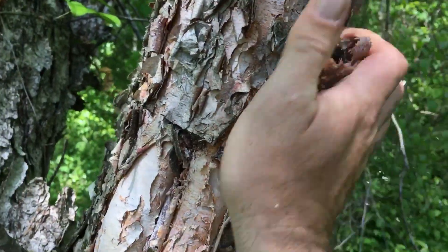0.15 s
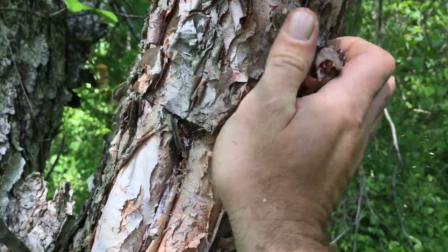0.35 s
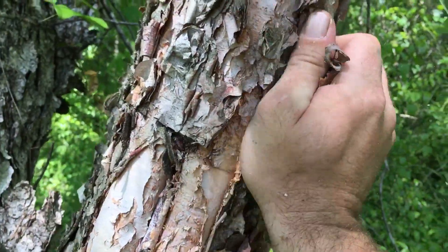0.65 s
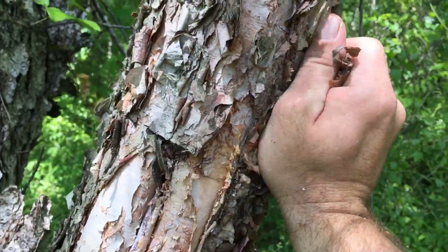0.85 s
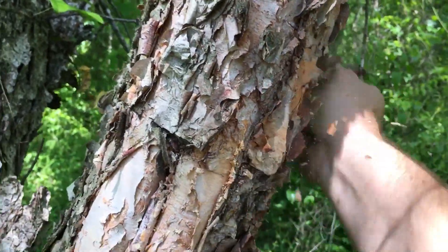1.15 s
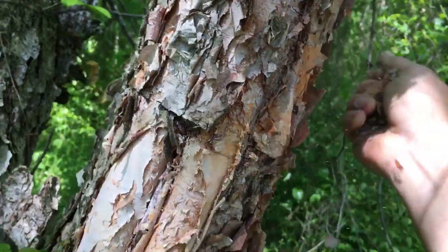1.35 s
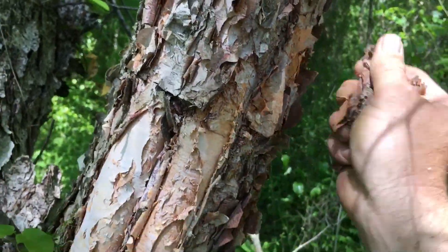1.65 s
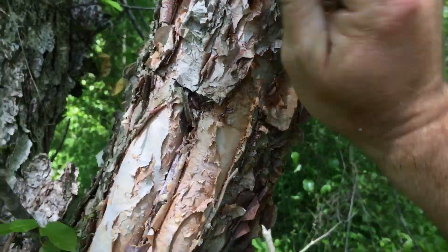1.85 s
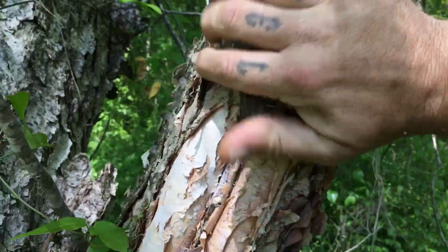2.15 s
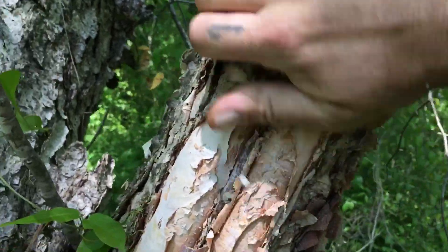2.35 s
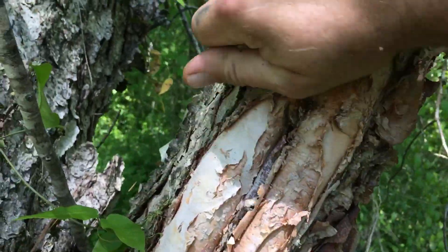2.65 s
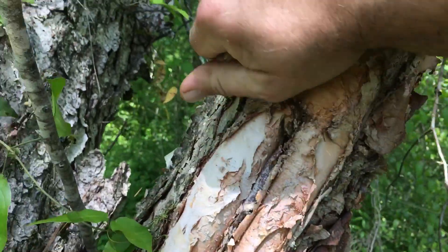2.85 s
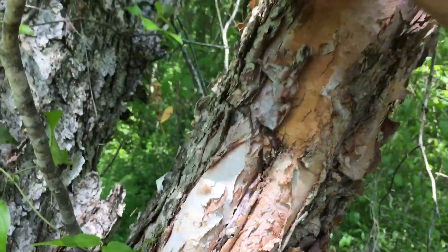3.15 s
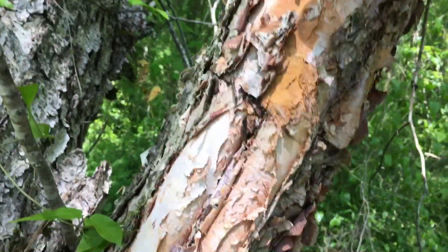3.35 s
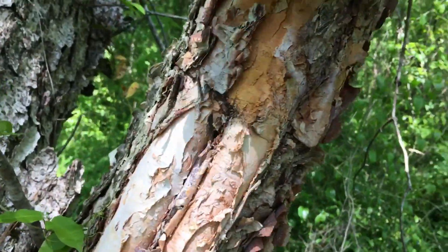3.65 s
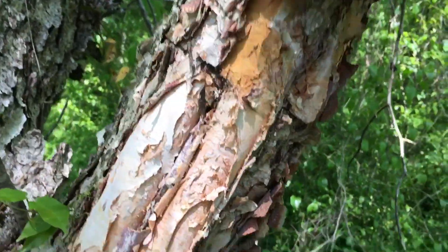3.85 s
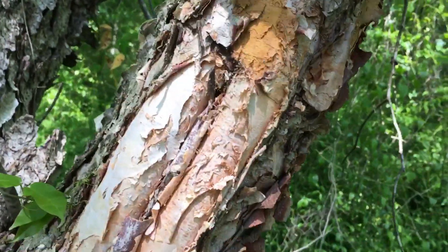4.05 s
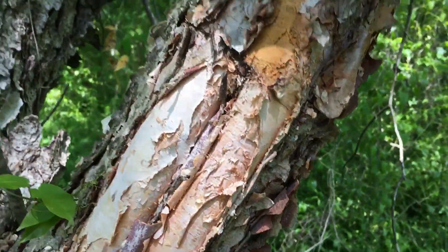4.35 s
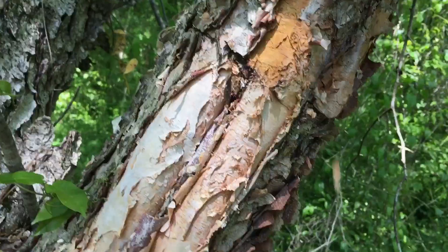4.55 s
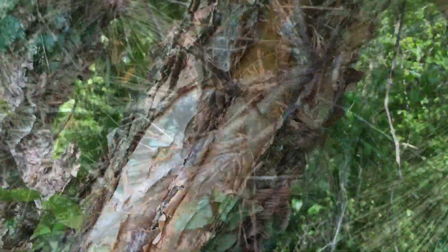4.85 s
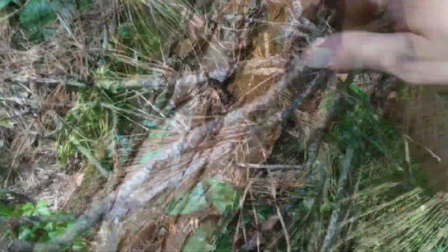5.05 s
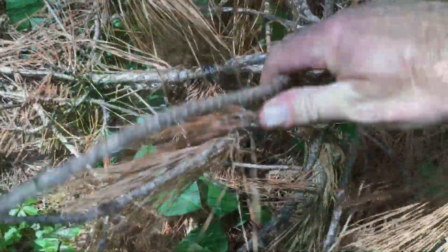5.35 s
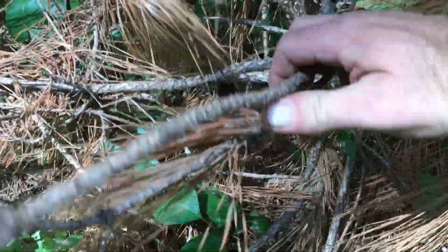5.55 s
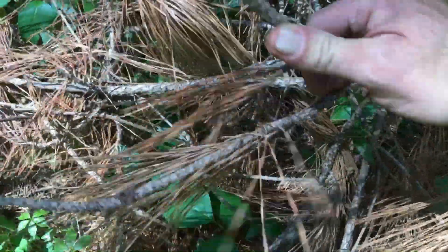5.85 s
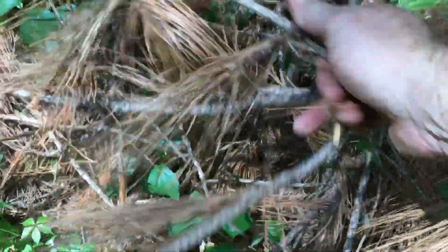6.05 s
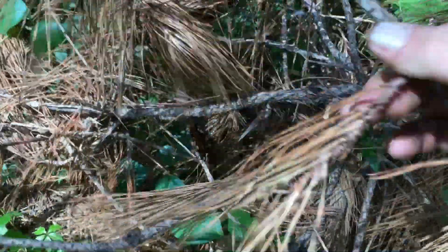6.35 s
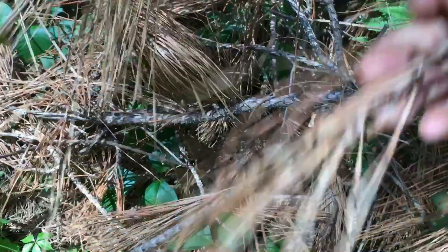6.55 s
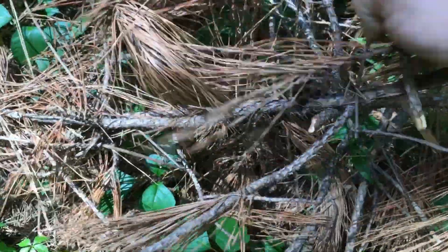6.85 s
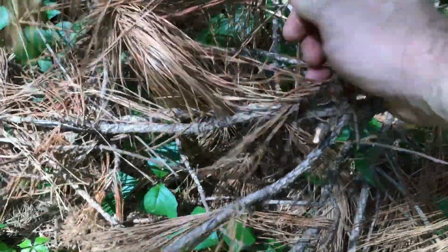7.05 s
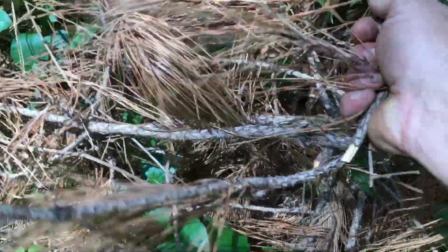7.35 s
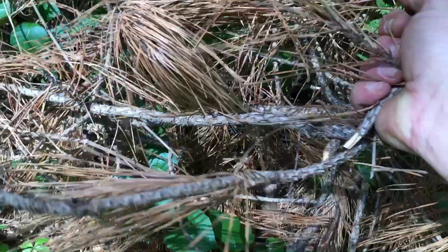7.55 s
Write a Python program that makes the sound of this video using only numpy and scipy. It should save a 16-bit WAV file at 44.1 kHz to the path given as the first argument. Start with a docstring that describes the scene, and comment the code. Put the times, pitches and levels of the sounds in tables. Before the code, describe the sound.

A steady, soft forest rush with low air buffeting lies under very close bark peeling, brittle and dry, with denser cracking midway and again just before the handling changes. Then sparse needle swishes and tiny twig ticks; the background suddenly becomes much quieter. One explosive snap overloads the microphone, echoes faintly among the trees, and delicate stirring follows.

```python
"""Close by in a murmuring wood, a hand peels and crushes dry bark: flakes crackle as clouds of tiny ringing
grains, and thicker plates crack off as sudden releases with splinters, heard through damped resonances.
From 5 s it stirs dead pine branches on the ground; the murmur drops away abruptly half a second later.
Just after 6 s a twig snaps as bursts of noise, loud enough to overload the microphone; low thuds follow it,
the wood answers with a faint, bright tail, and the stirring goes on lightly to the end."""
import sys
import numpy as np
from scipy import signal
from scipy.fft import rfft, irfft, next_fast_len
from scipy.io import wavfile
from scipy.ndimage import uniform_filter1d, map_coordinates

SR = 44100
rng = np.random.default_rng(int(sys.argv[2]) if len(sys.argv) > 2 else 0)


def generate_wav(sig):
    """Save sig (samples, or channels by samples) to the path in sys.argv[1] as 16-bit PCM at SR."""
    pcm = np.round(np.clip(np.atleast_2d(sig).T, -1, 1) * 32767).astype(np.int16)
    wavfile.write(sys.argv[1], SR, pcm)


N = 339570  # samples, 7.7 s

# Levels in the event and murmur tables are balanced within a layer; each layer may be trimmed in the mix.
# Murmur of the wood, dropping away abruptly before the snap: time_s, rush_level_db, far_drone_level_db
MURMUR_LEVELS = [(0, -51, -61), (1.3, -51, -55.5), (1.9, -50, -59.5), (3.15, -50, -53.5),
                 (3.6, -50.5, -61.5), (4.4, -50, -56), (5.0, -50, -52.5), (5.3, -50, -57),
                 (5.56, -49.5, -58), (5.585, -73, -77), (7.7, -79, -82)]
# Air buffeting the microphone: time_s, level_db
BUFFET_LEVELS = [(0, -41), (.12, -47.5), (.2, -54), (.8, -63), (1.3, -52), (1.7, -57), (2.9, -55.5),
                 (3.2, -46), (3.5, -61), (4.4, -57), (4.7, -49), (5.1, -55), (5.57, -47), (5.7, -63),
                 (6.1, -49), (6.4, -58), (7.7, -56)]
# Spectrum of the wood's broad rush: frequency_hz, relative_level_db (per Hz)
RUSH_SPECTRUM = [(40, -4), (110, -6.5), (170, -1), (240, -4), (350, 0.5), (550, -1), (800, -2), (1050, -2),
                 (1300, -2.5), (2000, -6), (3500, -14), (6000, -19), (10000, -34), (16000, -28)]
# Spectrum of the far drone: frequency_hz, relative_level_db (per Hz)
DRONE_SPECTRUM = [(100, -40.5), (450, -16.5), (700, -1.5), (820, 0), (1000, -3.5), (1400, -20),
                  (4000, -49.5)]
# Spectrum of the quiet hiss: frequency_hz, relative_level_db (per Hz)
HISS_SPECTRUM = [(30, 13.5), (60, 11), (100, 8.5), (200, 1.5), (330, -1.5), (700, 0), (1300, -4),
                 (2500, -1), (4000, -2.5), (9000, -1.5), (16000, -7)]
# Spectrum of the slowest swells of air: frequency_hz, relative_level_db (per Hz)
DRAUGHT_SPECTRUM = [(1, -7.5), (3, -1.5), (5, 1), (9, 0), (13, -6.5), (20, -24), (40, -52), (200, -100)]
# Spectrum of the buffeting: frequency_hz, relative_level_db (per Hz)
BUFFET_SPECTRUM = [(8, -10), (20, 1.5), (32, -3), (50, -12), (80, -20), (130, -34), (300, -56.5),
                   (1000, -100)]
# Ring time of the trees, for a fall of 60 dB: frequency_hz, t60_s
TREE_RING_TIMES = [(100, .5), (600, .6), (2500, 0.43), (9000, .65), (16000, 0.55)]
# Colour of the trees' answer: frequency_hz, gain_db
TREE_COLOUR = [(100, 4.5), (400, 2.5), (1200, 1.5), (2800, -4.5), (6000, -2), (9000, -1.5), (16000, 0.5)]

# Pushes through the dead branches: start_s, length_s, needles_level_db, branches_level_db
BRANCH_PUSHES = [(5.0, .13, -57, -59), (5.18, .04, -47.5, -47.5), (5.31, 0.21, -50.5, -53.5),
                 (5.66, 0.11, -60.5, -63.5), (5.865, 0.084, -58.5, -67), (6.2, .3, -56.5, -63),
                 (6.625, .05, -53, -63), (6.83, .02, -55, -68), (6.96, 0.058, -54, -64.5),
                 (7.1, .12, -53.5, -62.5), (7.29, .15, -54, -61.5), (7.63, .07, -53, -62)]
# A push: time to rise its last 10 dB, swell, and fall as the needles settle
PUSH_ATTACK_S, PUSH_BUILD_DB, PUSH_RELEASE_DB_PER_S = 0.027, 1, 200
# Clearest ticks of small twigs: start_s, level_db (over one millisecond), pitch_hz
CLEAR_TWIG_TICKS = [(5.2043, -34.5, 2600), (5.3987, -33.5, 6000), (5.5133, -38, 6100),
                    (5.5542, -38.5, 4300), (5.8658, -42, 9900), (5.9237, -41.5, 11100),
                    (5.9794, -42.5, 5400), (6.5001, -43.5, 7700), (6.556, -39, 8200), (6.6317, -41, 4500),
                    (6.8259, -36.5, 14000), (7.015, -42, 7100), (7.2031, -42, 8200)]
# Spectrum of brushing needles: frequency_hz, relative_level_db (per Hz)
NEEDLE_SPECTRUM = [(300, -40), (1500, -17), (3000, -5.5), (5500, 2), (9200, 1), (13000, -1.5), (16000, -4)]

# The jolt of the break and its rebounds: start_s, level_db, pitch_hz, t60_s
BREAK_JOLTS = [(6.047, -17.5, 52, 0.08), (6.048, -27.5, 124, 0.038), (6.068, -27, 24, 0.26),
               (6.088, -37.5, 100, 0.092), (6.15, -53, 210, 0.13)]
# Fibre bundles of the snapping twig: start_s, level_db, t60_s
FIBRE_BREAKS = [(6.0452, -34, .012), (6.0472, -1, .015), (6.0501, -8, .012), (6.071, -37, .008),
                (6.093, -45, .012)]
# Colour of the parting fibres: frequency_hz, gain_db
FIBRE_COLOUR = [(60, -15.5), (500, -13), (1300, -7.5), (2500, -1.5), (5000, -0.5), (8000, 1.5),
                (12000, -2.5), (16000, -4.5)]
# Resonances of the twig: pitch_hz, relative_level_db
TWIG_RESONANCES = [(2450, -4), (2750, 1.5), (3050, -1.5), (3850, -3.5), (5975, 5), (7260, -2.5),
                   (8250, -4.5), (9260, -3), (9750, 3)]
TWIG_T60_S = .02

# Duller knocks of thick wood: start_s, level_db (over one millisecond), pitch_hz
WOOD_KNOCKS = [(.5738, -24, 1304), (2.9214, -31, 650), (2.9999, -28, 850), (4.425, -29.5, 950),
               (4.545, -25, 1150), (4.585, -27, 380), (4.5958, -18.5, 740), (4.663, -26.5, 500),
               (4.694, -27.5, 548), (5.603, -42, 220), (6.6317, -39, 2500), (6.738, -49, 1007)]
# Pulls at the bark: start_s, length_s, thin_flakes_level_db, thick_flakes_level_db
BARK_PULLS = [(0.0, .03, -37.5, -43), (0.06, 0.061, -42.5, -41), (0.17, 0.099, -42.5, -45),
              (0.33, 0.057, -41.5, -47.5), (0.405, 0.051, -35, -42), (0.548, 0.0265, -36, -40.5),
              (0.64, .05, -44, -49), (0.72, 0.056, -36.5, -41.5), (0.84, 0.028, -38.5, -45.5),
              (0.905, 0.03, -40.5, -43), (1.0, .02, -40, -42), (1.035, 0.056, -36.5, -38.5),
              (1.13, 0.052, -42, -40), (1.435, 0.05, -47, -55), (2.035, 0.028, -43, -42),
              (2.09, 0.023, -44, -45.5), (2.16, 0.052, -40.5, -44.5), (2.285, 0.057, -44.5, -47.5),
              (2.36, 0.084, -37, -40.5), (2.57, 0.033, -44, -50), (2.615, 0.048, -29, -28.5),
              (2.68, 0.027, -33.5, -36.5), (2.75, .025, -39.5, -43), (2.83, 0.052, -36.5, -40.5),
              (2.9, 0.086, -30.5, -35), (3.01, .035, -39.5, -46), (3.205, 0.0305, -41, -52),
              (3.365, 0.027, -41, -47), (3.455, 0.038, -50, -52), (3.66, 0.1, -47, -46),
              (3.77, 0.031, -32.5, -37.5), (4.02, .07, -36.5, -41), (4.11, 0.048, -40, -45),
              (4.215, 0.053, -38, -39.5), (4.37, 0.067, -38, -39), (4.47, 0.08, -38, -37),
              (4.555, 0.043, -25, -26.5), (4.63, 0.053, -32.5, -33), (4.76, .035, -47.5, -61)]
# A pull: time to rise its last 10 dB, swell while the strain builds, and fall once the bark gives
PULL_ATTACK_S, PULL_BUILD_DB, PULL_RELEASE_DB_PER_S = 0.015, 3, 524
# The hand rests on the bark, or holds loose flakes, and they rustle faintly: start_s, length_s, level_db
HAND_GRIPS = [(0.0, 1.185, -47.5), (1.33, .32, -59), (1.73, .28, -57.5), (2.04, 1.02, -53), (3.14, .1, -60),
              (3.645, 1.06, -47.5)]
GRIP_THICK_DB = -5  # thick flakes against thin ones under a resting hand
# The biggest bark plates cracking: start_s, level_db (over one millisecond), pitch_hz
PLATE_CRACKS = [(0.0302, -25, 4704), (0.1072, -27.5, 2100), (0.3648, -23, 5450), (0.4396, -22, 4900),
                (0.5738, -22.5, 1880), (0.696, -21, 4700), (0.7623, -23, 4910), (0.8255, -29, 7970),
                (0.8391, -23.5, 3340), (0.9062, -28.5, 2800), (1.0247, -11.5, 2050), (1.0428, -24, 4810),
                (1.1321, -29, 3300), (1.1454, -26.5, 3500), (2.0618, -22, 3650), (2.2684, -31, 3790),
                (2.3087, -33, 3090), (2.4518, -21, 4190), (2.5088, -29.5, 5000), (2.606, -21.5, 6030),
                (2.6226, -20.5, 3390), (2.6331, -12, 6800), (2.6546, -16, 2500), (2.6651, -10, 3380),
                (2.6856, -15.5, 4430), (2.7087, -13.5, 3900), (2.7551, -20.5, 7080), (2.7701, -24, 3490),
                (2.8714, -13, 5280), (2.8936, -14.5, 4200), (2.9161, -12.5, 3133), (2.9214, -14, 4196),
                (2.9385, -8.5, 4800), (3.038, -26.5, 5200), (3.2393, -29, 4500), (3.495, -35, 3500),
                (3.7841, -27, 7090), (4.06, -28, 5000), (4.2482, -26.5, 5170), (4.3142, -28.5, 3000),
                (4.3661, -23, 3800), (4.4048, -23, 5780), (4.4158, -20, 2190), (4.4867, -25, 1680),
                (4.5111, -25, 2694), (4.5195, -20, 1800), (4.5425, -15.5, 2500), (4.5573, -10.5, 4400),
                (4.5706, -13.5, 5500), (4.5773, -14.5, 4400), (4.5851, -9, 5330), (4.5958, -10, 3000),
                (4.6312, -17.5, 7100), (4.6513, -9.5, 3940), (4.6778, -21.5, 2905)]
# Spectrum of thin flakes: frequency_hz, relative_level_db (per Hz)
THIN_SPECTRUM = [(300, -49), (1500, -20), (3000, -4.5), (4300, 0), (5700, 0.5), (7500, -1.5), (9200, -2),
                 (13000, -6), (16000, -10)]
# Spectrum of thick flakes and rubbing branches: frequency_hz, relative_level_db (per Hz)
THICK_SPECTRUM = [(80, -36.5), (250, -16.5), (600, -11), (950, -4), (1300, 2.5), (1700, -2), (2450, -0.5),
                  (3100, -2.5), (4000, -6.5), (6000, -23.5), (12000, -40.5)]
# Colour of the cracking plates: frequency_hz, gain_db
PLATE_COLOUR = [(300, -1), (900, -2), (1250, 4), (1700, -0.5), (2450, 0.5), (3100, 1.5), (4300, -3.5),
                (5800, 0.5), (7500, -1), (9300, 0.5), (16000, 1.5)]

# Colour of the microphone: frequency_hz, gain_db
MICROPHONE_COLOUR = [(20, 0), (8000, -0.5), (9500, 1.5), (10200, -4.5), (11500, -4), (13000, -2.5),
                     (15000, -3), (16000, -8.5)]
TOP_HZ = 15950  # band limit of the microphone


def amp(db):
    """Decibels to gain."""
    return 10 ** (np.asarray(db) / 20)


def unit(x):
    """Scaled to rms 1."""
    return x / np.sqrt(np.mean(x ** 2) + 1e-20)


def along(points, hz):
    """Values between (frequency_hz, value) points, on a logarithmic frequency axis."""
    point_hz, values = np.transpose(points)
    return np.interp(np.log(hz + .1), np.log(point_hz), values)


def curves(rows):
    """One value per sample for each column after the time."""
    time_s, *columns = np.transpose(rows)
    return [np.interp(np.arange(N) / SR, time_s, column) for column in columns]


def wobble(rate):
    """A smooth random curve, rate knots a second."""
    knots = rng.standard_normal(int(N * rate / SR) + 4)
    return map_coordinates(knots, [np.arange(N) * rate / SR])


def add(track, start_s, sound):
    """Mix a sound into the track at its start time."""
    part = track[max(0, round(start_s * SR)):][:len(sound)]
    part += sound[:len(part)]


def colour(x, spectrum, size=4096):
    """Causal minimum-phase filter with the given spectrum, so that clicks keep their sharp front."""
    gain = amp(along(spectrum, np.fft.rfftfreq(size, 1 / SR)))
    cepstrum = irfft(np.log(gain))
    # folding the cepstrum forward in time makes the filter minimum-phase
    cepstrum[1:size // 2] *= 2
    cepstrum[size // 2 + 1:] = 0
    response = irfft(np.exp(rfft(cepstrum)))[:size // 2]
    return signal.fftconvolve(x, response)[:len(x)]


def noise(spectrum):
    """Coloured noise of rms 1."""
    m = next_fast_len(N + SR)
    gain = amp(along(spectrum, np.fft.rfftfreq(m, 1 / SR)))
    white = rfft(rng.standard_normal(m))
    return unit(irfft(white * gain, m)[:N])


def strokes(rows, attack_s, build_db, release_db_per_s):
    """Level in dB of each layer under a series of hand movements: each sets in, swells and dies away."""
    t, power = np.arange(N) / SR, 1e-10
    for start_s, length_s, *levels_db in rows:
        early_s = np.maximum(start_s - t, 0)
        late_s = np.maximum(t - start_s - length_s, 0)
        swell = np.clip((t - start_s) / length_s, 0, 1) - 1
        shape_db = build_db * swell - 10 * early_s / attack_s - release_db_per_s * late_s
        shape = amp(np.maximum(shape_db, -100))
        power = power + np.outer(amp(levels_db), shape) ** 2
    return 10 * np.log10(power)


def crackle(spectrum, rate, spread_db, clump_db, cycles, centre_hz,
            clump_rate=260, clump_life=.002, size=72):
    """Tiny fractures, near rms 1: each rings its own flake for a few cycles, and they come in avalanches."""
    count = int(rate * N / SR)  # rate and clump_rate are per second, clump_life in seconds
    when, strength, phase, pitch = rng.random((count, 4)).T
    start = (when * (N - size)).astype(int)
    hz = centre_hz * 5 ** (2 * pitch - 1)
    hz = np.minimum(hz, SR / 2 * (1 - phase / 2))[:, None]
    gain = amp(spread_db * np.minimum(-np.log(1 - strength), 4))[:, None]
    turns = hz * np.arange(size) / SR
    ring = np.exp(-turns / cycles) * np.sin(2 * np.pi * (turns + phase[:, None]))
    grains = gain * hz * ring * np.linspace(1, 0, size)
    places = start[:, None] + np.arange(size)
    x = np.bincount(places.ravel(), grains.ravel(), N)
    # an avalanche starts at once and dies away within milliseconds
    triggers = (rng.random(N) < clump_rate / SR) * rng.exponential(1, N) ** 2
    avalanche = signal.lfilter([1], [1, -np.exp(-1 / (clump_life * SR))], triggers)
    clumping = np.sqrt(1 + amp(clump_db) ** 2 * avalanche / np.mean(avalanche))
    x = colour(x * clumping, spectrum)
    # the hand feeds energy in steadily: a large fracture relieves its neighbours
    power = uniform_filter1d(x ** 2, size=SR // 50)
    power = np.abs(uniform_filter1d(power, size=SR // 70))
    return x / np.sqrt(power + np.mean(power) / 100)


def small_cracks(level_db, rate, crowding, over_db, spread_db, centre_hz, octaves):
    """Rows of chance cracks that grow louder and more frequent with the rustle they come from."""
    when, luck, strength, pitch = rng.random((int(rate * N / SR), 4)).T
    rustle_db = level_db[(when * N).astype(int)]
    crack_db = rustle_db + over_db + spread_db * (2 * strength - 1)
    hz = centre_hz * 2 ** (octaves * (2 * pitch - 1))
    rows = np.transpose([when * N / SR, crack_db, hz])
    return rows[luck < amp(crowding * (rustle_db - level_db.max()))]


def cracks(rows, quality, splinter_db, splinter_t60, size=1024):
    """Each crack is one sudden release and a spray of splinters, heard through a heavily damped plate."""
    out, t = np.zeros(N), np.arange(size) / SR
    for start_s, level_db, hz in rows:
        hz = np.clip(hz, 100, 14000)
        life_s = splinter_t60 * np.exp(rng.normal(0, .3))
        spray = rng.standard_normal(size) * rng.exponential(1, size) * amp(-60 * t / life_s)
        # splinters are small, so their spray is bright
        spray = signal.lfilter(*signal.butter(1, 3000, "high", fs=SR), spray)
        force = amp(splinter_db) * spray / np.linalg.norm(spray)
        force[0] += rng.choice([-1, 1])  # the release pushes or pulls
        ring = signal.lfilter(*signal.iirpeak(hz, max(quality, hz / 9000), SR), force)
        # a small plate radiates little below its pitch and is too slow far above it
        ring = signal.lfilter(*signal.butter(2, hz / 2, "high", fs=SR), ring)
        ring = signal.lfilter(*signal.butter(1, min(3 * hz, 19000), fs=SR), ring)
        # the level counts the whole energy as if spread over one millisecond
        add(out, start_s, amp(level_db) * ring / np.linalg.norm(ring) * np.sqrt(SR / 1000))
    return out


def air():
    """The murmur of the wood, a quiet hiss, and slow swells of air on the microphone, all shaped noise."""
    rush_db, drone_db = curves(MURMUR_LEVELS)
    rush = amp(rush_db + 0.36 * wobble(5)) * noise(RUSH_SPECTRUM)
    drone = amp(drone_db + 0.92 * wobble(7)) * noise(DRONE_SPECTRUM)
    draught = amp(-35.5) * noise(DRAUGHT_SPECTRUM)
    buffet_db, = curves(BUFFET_LEVELS)
    buffet = amp(buffet_db + 1.5 * wobble(8.3)) * noise(BUFFET_SPECTRUM)
    hiss = amp(-59.5 + 0.62 * wobble(8.2)) * noise(HISS_SPECTRUM)
    return rush + drone + draught + buffet + hiss


def trees(x, near_db, near_t60, far_db):
    """Nearby ground and trunks scatter a short answer, the wood beyond a long faint one."""
    hz, t, cells = signal.stft(rng.standard_normal(SR * 3 // 4), SR, nperseg=256)
    # each frequency dies away at its own pace
    decay = amp(-60 * t / along(TREE_RING_TIMES, hz)[:, None])
    far = colour(signal.istft(cells * decay, SR, nperseg=256)[1], TREE_COLOUR)
    t = np.arange(len(far)) / SR
    near = rng.standard_normal(len(t)) * amp(-60 * t / near_t60)
    answer = amp(far_db) * far / np.linalg.norm(far) + amp(near_db) * near / np.linalg.norm(near)
    soft_onset = 1 - np.exp(-t / .002)
    return signal.fftconvolve(x, answer * soft_onset)[:N]


def branches():
    """Dry needles brush each other while small twigs rub and tick, all as tiny fractures."""
    needles_db, branches_db = strokes(BRANCH_PUSHES, PUSH_ATTACK_S, PUSH_BUILD_DB, PUSH_RELEASE_DB_PER_S)
    needles = amp(needles_db + 1.5) * crackle(
        NEEDLE_SPECTRUM, rate=6000, spread_db=2.0, clump_db=0.5, cycles=1.8, centre_hz=7000)
    rubbing = amp(branches_db) * crackle(
        THICK_SPECTRUM, rate=2500, spread_db=3.5, clump_db=5.5, cycles=1.6, centre_hz=2000)
    chance_ticks = small_cracks(
        needles_db, rate=28, crowding=.3, over_db=8.5, spread_db=3.5, centre_hz=6300, octaves=.8)
    ticks = amp(1.5) * cracks(
        [*CLEAR_TWIG_TICKS, *chance_ticks], quality=0.58, splinter_db=2.5, splinter_t60=0.0079)
    return needles + rubbing + ticks


def jolt():
    """The freed branch kicks back with a few low thuds, each a decaying sine."""
    out, t = np.zeros(N), np.arange(SR // 3) / SR
    for start_s, level_db, hz, t60_s in BREAK_JOLTS:
        add(out, start_s, -amp(level_db - 60 * t / t60_s) * np.sin(2 * np.pi * hz * t))
    return out


def fracture():
    """Force of the parting fibre bundles, a decaying noise burst each; the loudest part within milliseconds."""
    force, t = np.zeros(N), np.arange(SR // 20) / SR
    for start_s, level_db, t60_s in FIBRE_BREAKS:
        add(force, start_s, amp(level_db - 60 * t / t60_s) * rng.standard_normal(len(t)))
    return force


def snap():
    """The fracture cracks through the air and briefly rings the twig's resonances."""
    force, t = fracture(), np.arange(SR // 20) / SR
    ring = sum(amp(db - 60 * t / TWIG_T60_S) * np.cos(2 * np.pi * hz * t) for hz, db in TWIG_RESONANCES)
    crack = amp(5.5) * colour(force, FIBRE_COLOUR)
    return crack + amp(-29.5) * signal.fftconvolve(force, ring)[:N]


def knocks():
    """Thick wood knocks: sudden releases through damped resonances, mostly low."""
    return amp(-1) * cracks(WOOD_KNOCKS, quality=1.6, splinter_db=1, splinter_t60=0.016)


def bark():
    """Thin outer flakes fizz, thicker ones crunch, and whole plates crack off."""
    pull_db = strokes(BARK_PULLS, PULL_ATTACK_S, PULL_BUILD_DB, PULL_RELEASE_DB_PER_S)
    grip_db, = strokes(HAND_GRIPS, PULL_ATTACK_S, 0, PULL_RELEASE_DB_PER_S)
    # the louder of pulling and gripping is heard
    thin_db, thick_db = np.maximum(pull_db, [grip_db, grip_db + GRIP_THICK_DB])
    thin = amp(thin_db + 0.57) * crackle(
        THIN_SPECTRUM, rate=8000, spread_db=2.5, clump_db=0.5, cycles=1.8, centre_hz=5960)
    thick = amp(thick_db - 0.3) * crackle(
        THICK_SPECTRUM, rate=3500, spread_db=3, clump_db=3.0, cycles=2.2, centre_hz=2020)
    chips = small_cracks(
        thin_db, rate=100, crowding=.17, over_db=9.0, spread_db=3.5, centre_hz=4790, octaves=1.0)
    plates = amp(0.42) * cracks(
        [*PLATE_CRACKS, *chips], quality=1.34, splinter_db=-2, splinter_t60=.007)
    return thin + thick + colour(plates, PLATE_COLOUR)


def scene():
    """All the handling close by, in the open wood."""
    handling = knocks() + bark() + branches()
    answer = trees(handling, near_db=-20, near_t60=.12, far_db=-27)
    # the fracture leaves in every direction with a different colour, so its echoes blend into a smooth wash
    wash = np.zeros(N)
    for _ in range(4):
        outgoing = colour(fracture(), FIBRE_COLOUR)
        wash += trees(outgoing, near_db=-23.5, near_t60=.15, far_db=-23.0)
    return (handling + snap() + answer + wash + jolt() + air())[None]


def record(dry):
    """The microphone colours the treble, overloads on the snap and keeps nothing above its band limit."""
    x = colour(dry[0], MICROPHONE_COLOUR)
    x = x / (1 + np.abs(x / .92) ** 6) ** (1 / 6)  # overload bends peaks towards 0.92
    m = next_fast_len(N + SR // 2)
    kept = np.fft.rfftfreq(m, 1 / SR) < TOP_HZ
    return irfft(rfft(x, m) * kept, m)[None, :N]


dry = scene()
out = record(dry)
generate_wav(out)
```